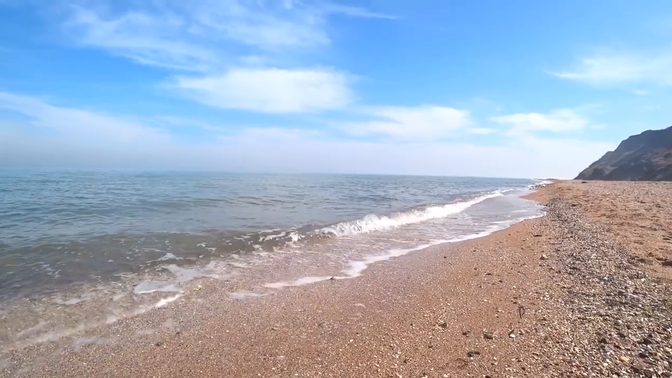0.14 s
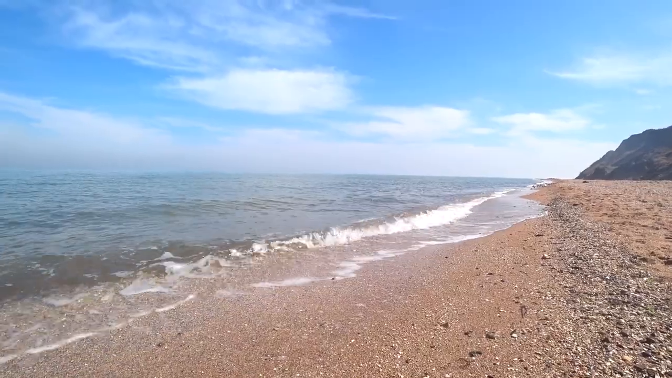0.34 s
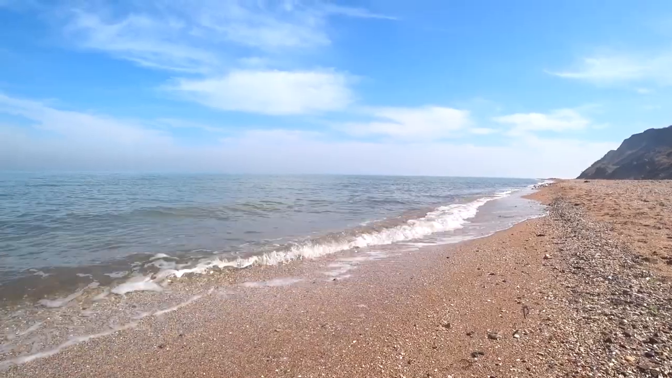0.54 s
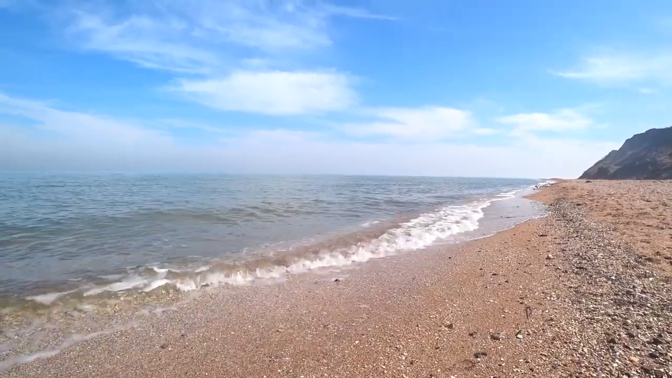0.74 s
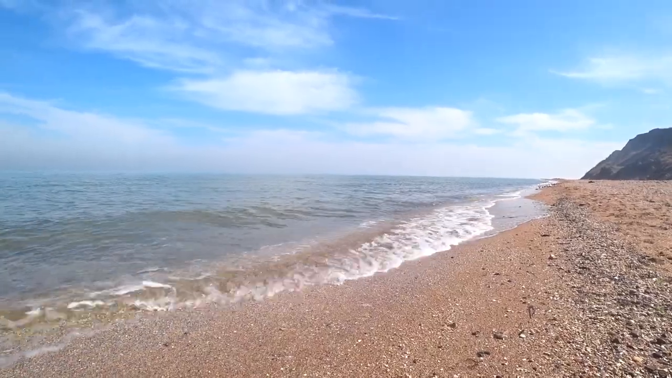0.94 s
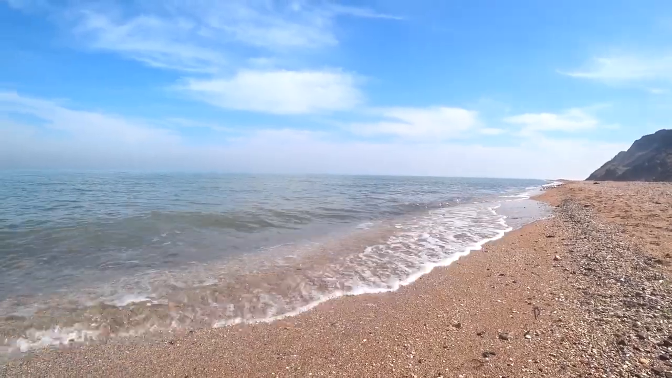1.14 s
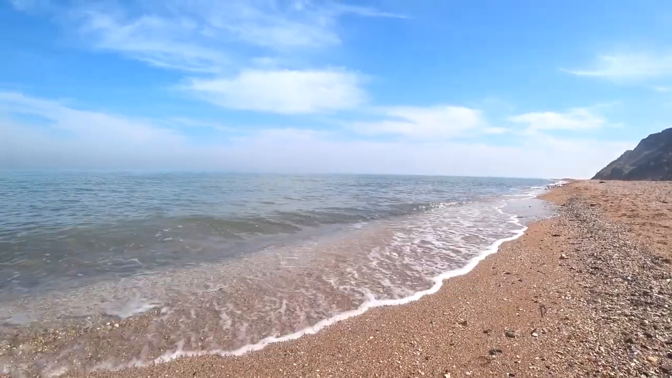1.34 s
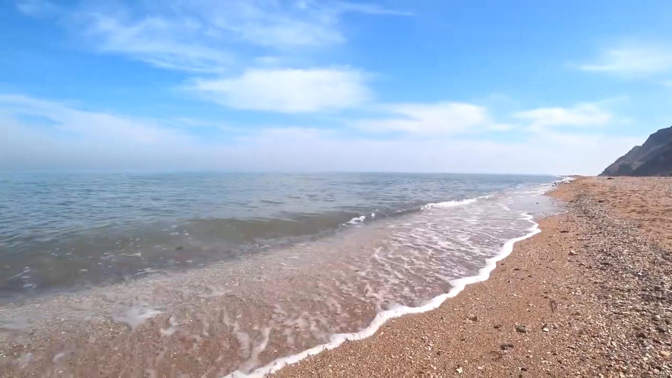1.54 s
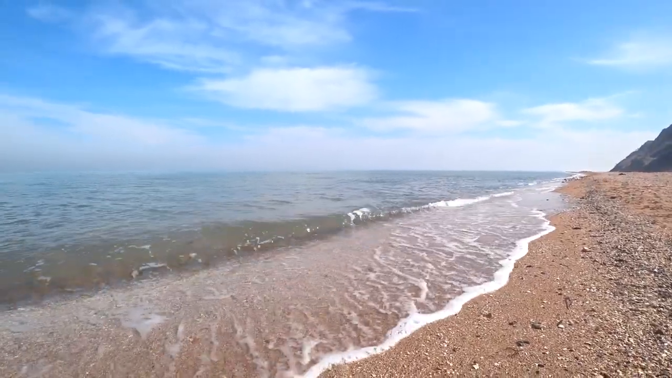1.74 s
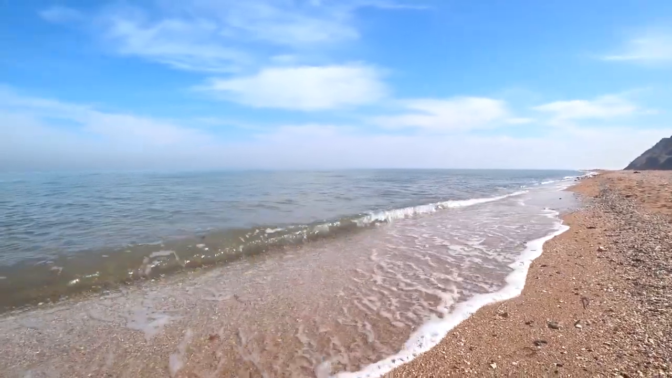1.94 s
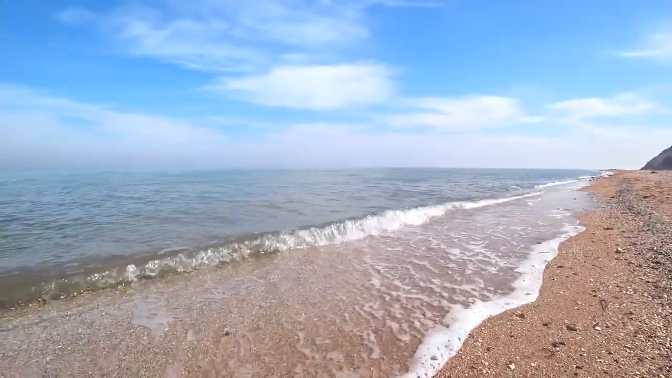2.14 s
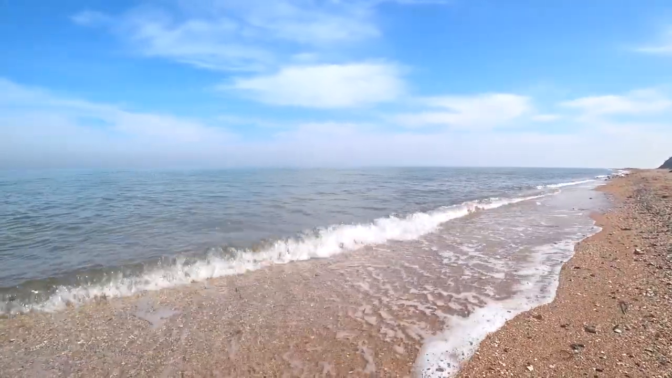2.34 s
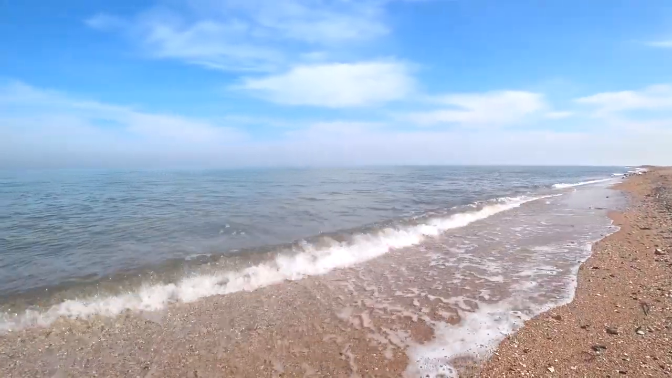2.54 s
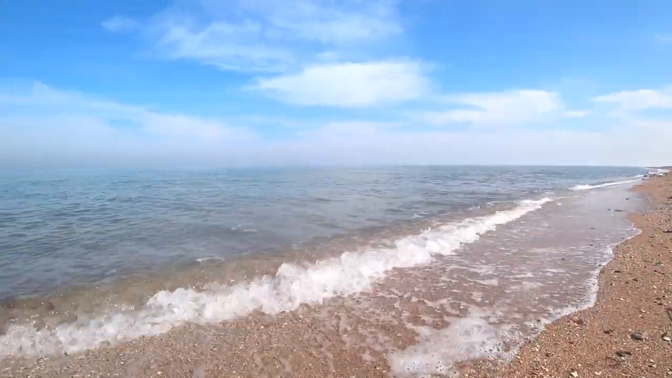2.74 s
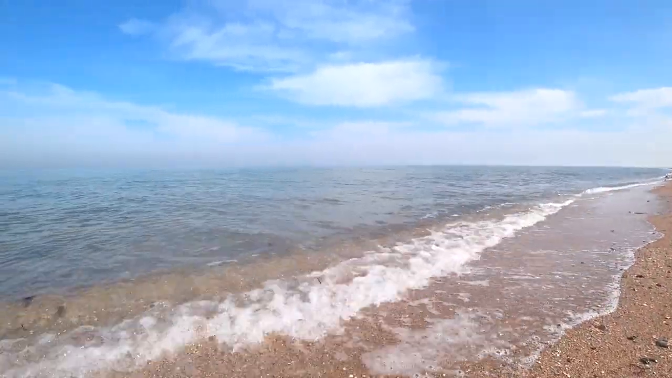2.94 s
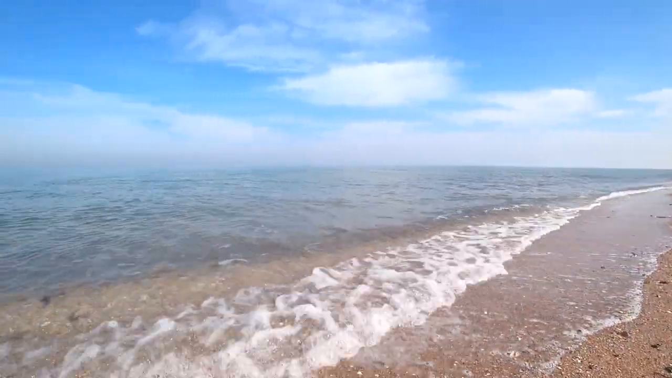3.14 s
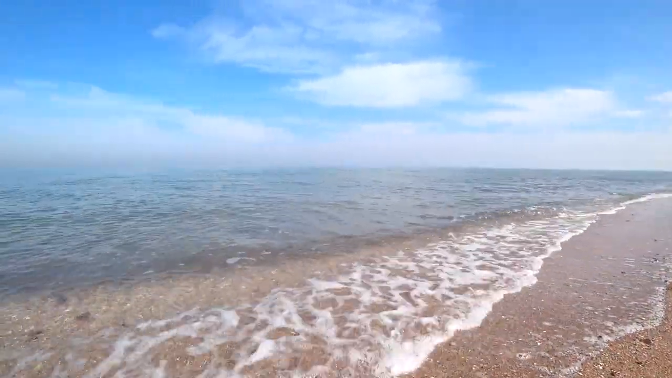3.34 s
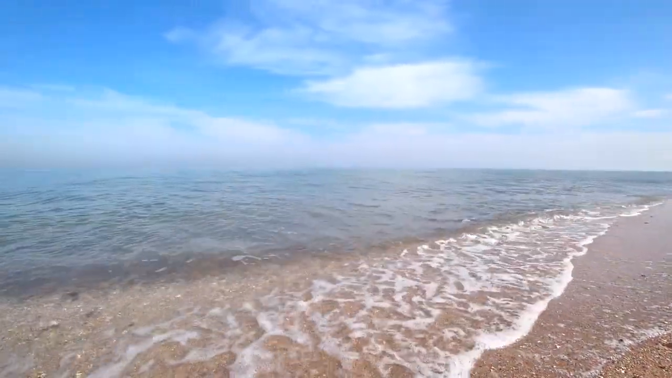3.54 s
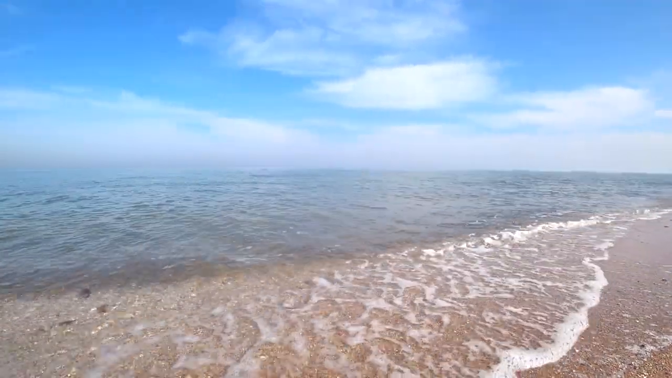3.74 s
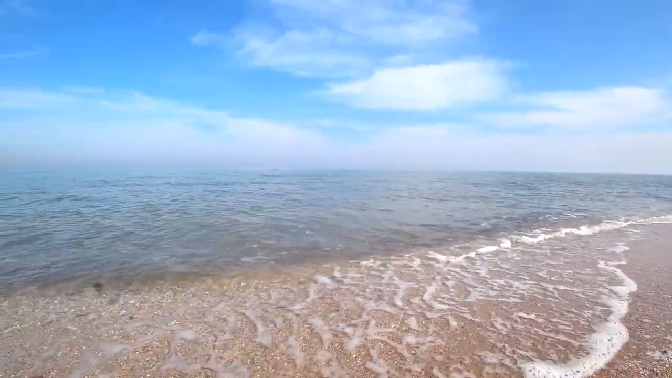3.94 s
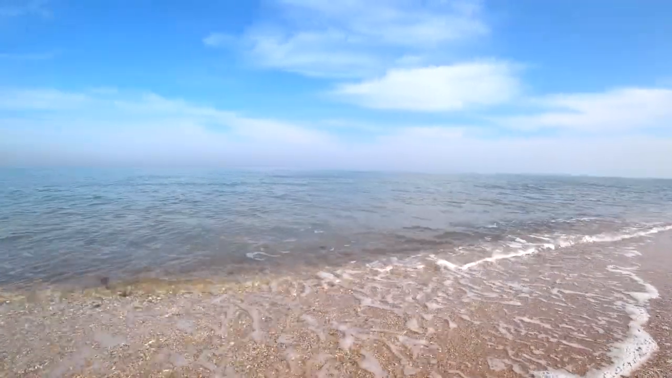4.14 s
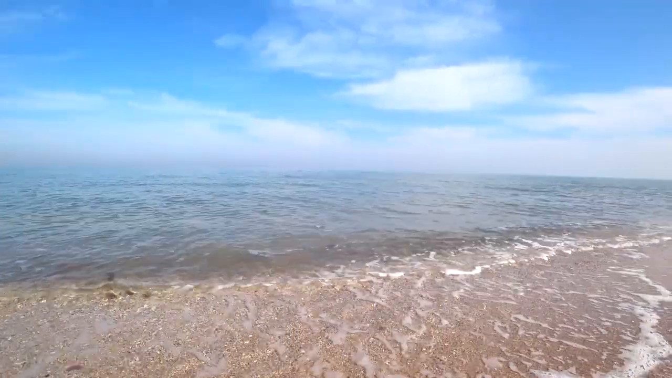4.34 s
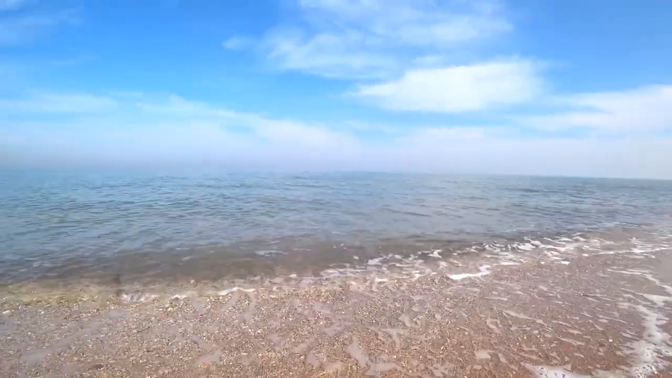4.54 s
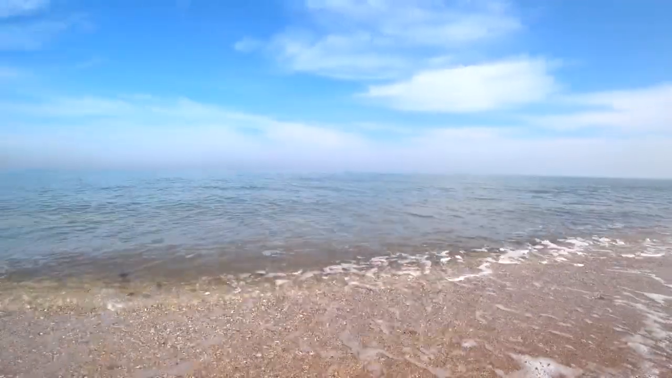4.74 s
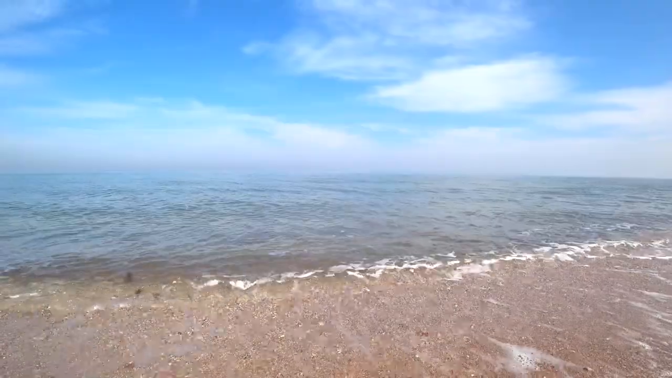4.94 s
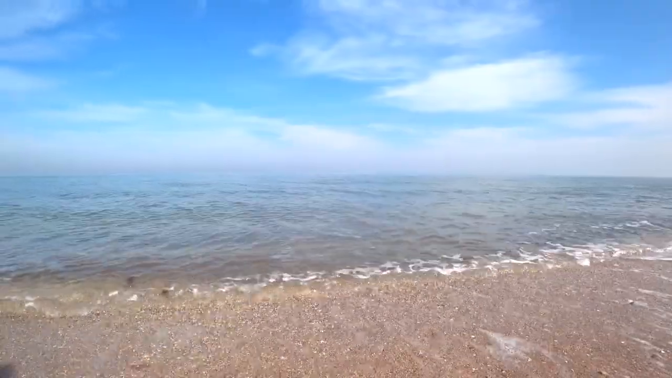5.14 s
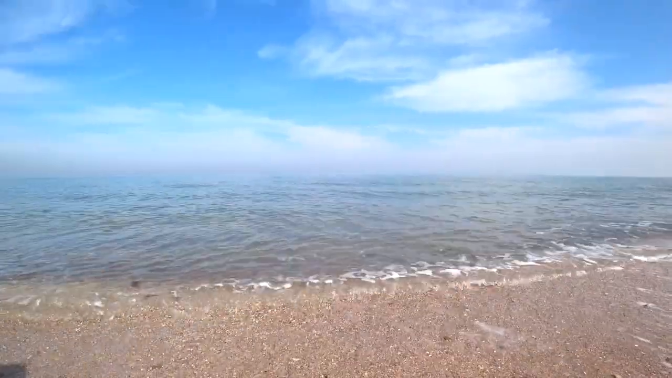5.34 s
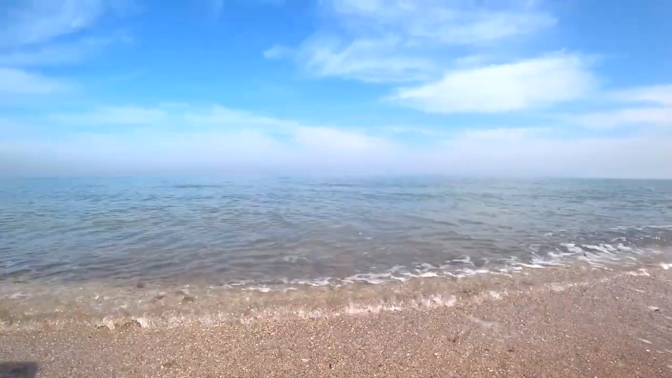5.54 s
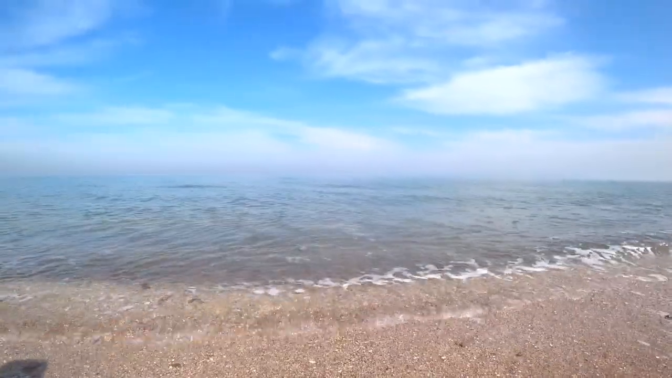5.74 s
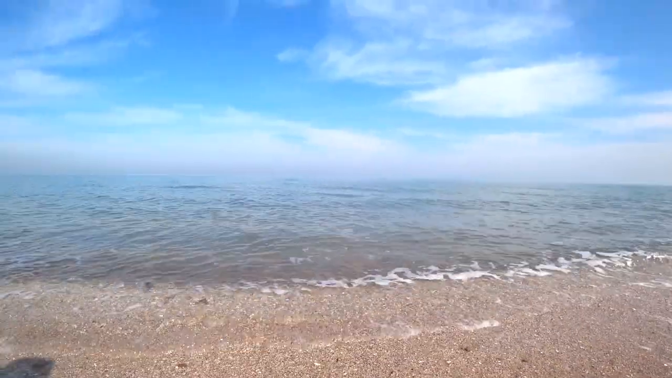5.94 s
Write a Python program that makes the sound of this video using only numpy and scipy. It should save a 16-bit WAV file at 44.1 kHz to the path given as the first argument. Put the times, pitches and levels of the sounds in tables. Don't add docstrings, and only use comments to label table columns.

```python
import sys
import numpy as np
from scipy import signal
from scipy.fft import rfft, irfft
from scipy.io import wavfile
from scipy.ndimage import uniform_filter1d

SR = 44100
rng = np.random.default_rng(int(sys.argv[2]) if len(sys.argv) > 2 else 0)


def master_out(mix):
    frames = np.transpose(np.atleast_2d(mix))
    ceiling = np.clip(frames, -1, 1)
    pcm = np.round(ceiling * 32767).astype(np.int16)
    wavfile.write(sys.argv[1], SR, pcm)


def gain_from_db(level_db):
    decades = np.asarray(level_db, float) / 20
    return 10 ** decades


N = 264159

# centre frequency in Hz, bandwidth in Hz.
BUBBLE_SIZES = [(290, 350), (950, 900), (2350, 2200), (7800, 5500)]
# frequency in Hz, level in dB.
WATER_COLOUR = [(60, -38), (100, -49), (160, -14.5), (290, -2), (500, 1), (950, 0.5), (1600, 0.5),
                (2200, 1.5), (3000, 1.3), (4000, 3), (5500, 1.5), (7800, -0.27), (11000, -8.5)]
# frequency in Hz, change of width in dB.
PORT_WIDTH = [(120, -5), (400, -8), (700, -3), (1200, 1), (2000, 2.5), (3500, -0.5), (6300, 3), (11000, 6)]
# frequency in Hz, share in dB.
GRAIN_SHARE = [(150, -2.5), (500, -6.5), (1500, -5.5), (4000, -4.5), (10000, -3.5)]
# frequency in Hz, density in dB per Hz.
SELF_NOISE_DENSITY = [(25, -114), (60, -107), (150, -110), (6000, -102), (11000, -92)]

# time in seconds, level in dB, coarseness in dB.
BREAKERS = [
    [(0, -33, 0), (0.1, -32.5, -0.5), (0.2, -34, 2.5), (0.45, -34, 2), (0.62, -35.5, 2.5), (0.7, -34.5, 2),
     (0.79, -37, 2.5), (0.85, -40.5, 0), (1.1, -46, 0.5)],
    [(1.86, -54, 3), (1.98, -38.5, 1), (2.12, -29.5, -3), (2.3, -25.5, -4), (2.5, -26, 0), (2.6, -27, 0),
     (2.78, -28.5, 0.5), (3.0, -37, 0), (3.3, -50.5, 2.5)],
    [(5.3, -51.5, -18), (5.45, -44.5, 4.5), (5.56, -43, 7), (5.66, -38.5, 0.5), (5.74, -42, -4),
     (5.77, -53, 3)],
]
# time in seconds, level in dB, coarseness in dB.
FAR_WATER = [(0, -61, -2), (0.9, -48, 1), (1.0, -43.5, 0.5), (1.12, -45, -2), (1.35, -40.5, -0.5),
             (1.6, -42.5, 1), (1.85, -39.5, -1.5), (3.0, -38.5, -0.5), (3.4, -46.5, 1), (3.75, -47, 2),
             (3.93, -41.5, -1), (4.4, -42.5, 0.5), (4.78, -42, -1), (5.08, -41, 1), (5.4, -42, 1),
             (5.79, -37.5, -5.5), (5.88, -39.5, -2.5), (5.99, -39, -3)]
# loudest time in seconds, level in dB, rise and fade in
# seconds for 10 dB.
FOAM = [
    (0.08, -44, .1, 0.7),
    (1.13, -46, 0.1, 0),
    (1.35, -47.5, 0.68, 0.5),
    (1.88, -51, 0.3, 1.9),
    (3.5, -43, 0.4, 0.57),
    (4.2, -56.5, 0.2, 4),
    (5.4, -50, 0.2, 0.4),
    (5.47, -44, 0.025, 0.06),
    (5.56, -42.5, 0.059, 0.1),
    (5.72, -63, 0.054, 0.8),
]
# time in seconds, level in dB, length in seconds.
GULPS = [(0.0, -44.5, 0.053), (0.254, -46, 0.2), (0.703, -49, 0.053), (0.87, -55, 0.11), (1.14, -54, 0.057),
         (1.428, -52, .05), (1.465, -55, .025), (1.7, -59, 0.081), (2.13, -55, .05), (2.372, -38.5, 0.17),
         (2.533, -46, 0.036), (2.68, -47, 0.051), (3.82, -64, 0.055), (4.915, -57, .1), (5.228, -58, 0.15),
         (5.977, -58, 0.045)]
# large, medium, small and foam bubbles in dB, side-to-mid width in dB.
WATER_KINDS = dict(breaker=(-19, -2.5, 0, -6, -14), far=(-17.5, 0, -2.5, -15.5, -4.5),
               foam=(-28, -15, -13.5, 0, -13), gulp=(0.5, -15, -7, -25, -10))
BREAKER_COARSENESS = (0.85, 1.25, 0.19, -0.25)
FAR_COARSENESS = (0.58, 1.27, 0, 0.031)
FROTH_DB = (0.5, 0, -3)
# time in seconds, left-right difference in dB.
BEARING = [(0, -2), (0.55, -1.5), (0.75, .5), (1.1, 1.5), (1.45, 3), (1.7, -1), (2.2, 0), (3.05, 2),
           (3.9, -2), (4.3, 2.5), (4.8, -.5), (5.7, -1), (5.9, -4.5)]
# time in seconds, level in dB.
LEVEL_BUMPS = [(0.17, 1.8), (0.22, -2), (0.85, 1), (0.888, -1.8), (1.59, 1.5), (1.894, -2), (1.92, 0),
               (2.013, -1.3), (2.062, -1), (2.205, 1.5), (2.239, 1.7), (2.36, -1), (2.404, 1.2), (2.448, 2),
               (2.481, 0.9), (2.588, -1), (2.713, -1.5), (2.92, -2), (2.967, -2), (3.121, -1.5), (3.268, -1.1),
               (4.33, 1), (4.779, 1.3), (5.185, 0.5), (5.288, -0.5), (5.368, -1), (5.44, 0), (5.479, -1),
               (5.508, -0.5), (5.543, 0.5), (5.588, -1), (5.622, -0.5), (5.664, -1), (5.731, -1), (5.79, -2)]

# start
# in seconds, peak in dB, frequency in Hz, left-right difference in dB.
PLOPS = [(0.0132, -29.5, 800, -5), (0.1208, -25.5, 1280, -4), (0.1689, -23.5, 1430, -1),
         (0.4163, -26.5, 750, -3), (0.4587, -38, 370, 1), (0.6388, -22, 800, 0), (0.6837, -34, 654, -1),
         (0.7814, -31, 1320, 4), (1.0623, -34, 624, 2), (1.0908, -30, 1450, 10), (1.2956, -35, 880, 2),
         (1.3809, -37, 640, 4), (1.4224, -29, 1360, 15), (1.4379, -30.5, 644, 5), (1.4435, -34.5, 382, 2),
         (1.5805, -31, 910, 4), (1.7571, -31.5, 940, 3), (2.1786, -25.5, 624, 2), (2.2014, -18, 1045, 1),
         (2.2692, -22.5, 827, 0), (2.3073, -19, 1260, 0), (2.3532, -24, 513, -2), (2.4055, -32, 890, -2),
         (3.0228, -30, 1030, 9), (4.1486, -37, 716, 4), (4.6597, -28.5, 1430, 9), (4.8528, -42, 483, -3),
         (5.6423, -30.5, 930, 6), (5.7009, -31, 1550, 3.5), (5.8798, -38, 980, -10)]
PINGS = [(0.3881, -22.5, 1780, -1), (0.5682, -19, 3360, 0), (0.6677, -20, 2180, 0),
         (0.7109, -21.5, 4000, 0), (0.7293, -23, 1780, 4), (0.7429, -18.5, 3880, 0), (0.7752, -26, 1890, 2),
         (1.2787, -29, 2030, 3), (1.3094, -30, 3040, 7), (1.3325, -30, 3540, 10), (1.3669, -29, 1810, 10),
         (1.4265, -30.5, 2500, 6), (1.5958, -30, 3250, 6), (2.0039, -20.5, 3240, -3),
         (2.24, -15.5, 1890, 0), (2.4414, -13, 3700, 4), (2.5138, -15, 3580, -1), (2.5183, -13.5, 1920, 5),
         (3.0772, -23.5, 2200, 1), (4.6215, -33, 3500, 5), (4.6764, -33, 3740, 7),
         (5.3466, -28.5, 2330, -8), (5.4286, -28, 3450, -6), (5.4568, -25, 6870, -3),
         (5.5461, -25, 5400, -2), (5.5734, -24, 3740, -1), (5.6021, -27, 2720, 0), (5.6424, -27, 5540, -1),
         (5.7462, -23, 2200, 2), (5.8014, -31, 1930, -1)]
BLOOPS = [(0.13, -51, 137, 3), (0.4075, -39, 346, -1), (0.6631, -37, 456, 2), (0.8636, -44, 313, 3),
          (1.117, -42, 390, 2), (1.2101, -52, 254, 0), (1.3295, -34, 930, 6), (1.4636, -51, 352, 2),
          (1.6474, -46, 450, -2), (1.7058, -47, 310, 1), (1.7404, -48, 427, 1), (2.1018, -39, 313, -2),
          (2.2762, -39, 420, 3), (2.3297, -34, 394, -4), (2.535, -51.5, 133, 1), (2.685, -30, 575, 2),
          (3.8549, -52, 300, -3), (4.2367, -43, 420, 2), (4.8199, -38, 694, 1), (5.1427, -43, 494, -2),
          (5.644, -51, 378, 5), (5.76, -42, 530, -1), (5.8902, -44, 533, -6), (5.9304, -43, 690, -6)]
POPS = [(0.4567, -28, 8410, 0), (1.1534, -33, 1160, 7), (1.4368, -30, 4000, 7), (1.4539, -34, 1320, 14),
        (2.3454, -16, 6870, -2), (2.367, -22, 1090, 0), (4.0776, -35, 3060, 9), (5.4748, -30, 6000, -1),
        (5.55, -32, 940, -4), (5.5611, -29, 7350, 4), (5.571, -30, 1350, -5), (5.5935, -28, 6000, -1),
        (5.5968, -28, 3470, 2.5), (5.6126, -34, 1540, -1), (5.6749, -28, 7350, -1), (5.7115, -27, 3760, -2),
        (5.7382, -26, 6400, 2), (5.7384, -27, 3060, -4)]
# start in seconds, peak in dB, frequency in Hz, left-right difference in dB.
FURTHER_BUBBLES = [(0.0454, -32, 8990, -2), (0.0889, -24, 6810, -3), (0.1593, -23, 6100, -5),
                   (0.1738, -30, 8990, -1), (0.1825, -29, 1090, -3), (0.4546, -28, 2960, -1),
                   (0.4974, -31, 1090, -3), (0.5366, -26, 1520, 1), (0.5478, -29, 1230, -2),
                   (0.587, -28, 820, 1), (0.6904, -30, 1800, 0), (0.7064, -22, 1590, 2), (0.7216, -29, 760, 0),
                   (0.722, -30, 1440, 1), (0.7561, -27, 2510, -1), (0.7505, -24, 3600, 0),
                   (0.7677, -29, 2160, -1), (0.7811, -30, 1290, 3), (0.7964, -28, 2250, 0),
                   (0.8624, -27, 5460, -1), (0.8726, -27, 5500, 1), (0.8726, -24.5, 3900, 2),
                   (0.8998, -28, 3130, 5), (1.1378, -35, 1800, 10), (1.1537, -29, 5770, 5),
                   (1.1661, -29, 4140, 0), (1.2082, -38, 1090, 10), (1.2085, -34, 1910, 11),
                   (1.2466, -36, 754, 4), (1.2912, -36, 855, 6), (1.2916, -33, 1610, 5), (1.309, -31, 4880, 6),
                   (1.3605, -31, 1920, 3), (1.3794, -31, 2800, 4), (1.383, -36, 466, 1), (1.4335, -33, 626, 4),
                   (1.395, -31, 2800, 6), (1.411, -31, 2130, 5), (1.4255, -33, 4620, 4), (1.4349, -34, 960, 7),
                   (1.473, -34, 1800, 9), (1.4759, -32, 2800, 7), (1.5771, -39, 2130, 7),
                   (1.7469, -31, 1440, 4), (1.7484, -30, 4370, 6),
                   (1.9269, -35.5, 646, 5), (1.9628, -34, 1010, 7), (1.986, -20, 4900, -6),
                         (1.9871, -26, 3150, 0), (1.9966, -30, 1100, -1), (2.0249, -36, 1160, 4),
                         (2.1025, -22, 4620, -1), (2.1246, -26, 2130, -1), (2.1319, -18, 5160, -3),
                         (2.182, -25, 1220, 2), (2.2124, -27, 1620, 12), (2.224, -23, 1800, 1),
                         (2.2603, -27, 1610, 2), (2.261, -19, 3130, 1), (2.2643, -19, 5160, -3),
                         (2.2781, -22, 5460, -2), (2.2962, -18, 2130, 1), (2.33, -23, 4880, 1),
                         (2.3822, -24, 686, 0), (2.3844, -20, 1710, -1), (2.4058, -22, 780, -1),
                         (2.407, -16, 3860, 0), (2.451, -18, 2050, 0), (2.524, -17, 1900, 2),
                         (2.4776, -28, 1020, -1), (2.5016, -28, 1100, 0), (2.507, -18, 2130, -1),
                         (2.5596, -23, 1220, 5), (2.6191, -21, 8040, 1), (2.6358, -18, 2510, 1),
                         (2.6514, -22, 4140, 1), (2.6794, -26, 766, 3), (2.6881, -29, 593, 0), (2.786, -25, 3910, 3),
                         (2.8408, -28, 1100, 3), (2.8731, -27, 9500, 0), (2.8775, -26, 1550, 1),
                         (2.9761, -30, 990, 4), (2.9917, -30, 6440, 2), (2.9943, -32, 9500, 5),
                         (3.0117, -24, 1700, 2), (3.0121, -26, 2250, 0), (3.0331, -28, 4880, 1),
                         (3.0563, -26, 2380, -1), (3.0737, -31, 1520, 7), (3.1318, -41, 790, 2),
                         (3.1536, -29, 3150, 3), (3.2279, -35, 1800, 3),
                   (3.6539, -39, 1050, 0), (3.8175, -38, 4880, 1), (3.9024, -33, 2510, -2),
                        (3.984, -35, 1810, -7), (4.0428, -34, 1370, -10), (4.4345, -45, 545, 4),
                        (4.6586, -33, 1900, 10), (4.5319, -40, 750, 3), (4.5468, -33, 1520, 0),
                        (4.7536, -37, 2530, -10), (4.7779, -39, 1530, 3), (4.881, -39, 1450, -7.5),
                        (4.887, -38, 930, -7), (4.9128, -34, 1800, 2), (4.9538, -34, 9500, 5),
                        (4.9629, -38, 1090, -8), (5.0191, -39, 880, -3), (5.0612, -36.5, 1900, 16),
                        (5.0654, -36, 895, 1), (5.2085, -37, 2800, 1), (5.2089, -38, 775, 5), (5.308, -31, 2670, 0),
                        (5.388, -30, 2250, 5), (5.4676, -32, 1440, -2), (5.4967, -26, 2650, 2),
                        (5.51, -35, 616, -2.5), (5.536, -32, 1700, -3), (5.5427, -27, 5460, 0),
                        (5.5521, -31, 3910, -3), (5.5637, -27, 3500, 3), (5.572, -24, 5200, 2),
                        (5.598, -29, 2650, 1), (5.749, -25, 2280, 2), (5.711, -34, 7200, 1), (5.7157, -30, 1600, -2),
                        (5.7988, -30, 2020, -1), (5.867, -39, 835, -8), (5.9, -37.5, 1700, -12),
                        (5.924, -31, 3530, -11), (5.9646, -42, 1700, -10)]
# start in seconds, peak in dB.
SPLATS = [(0.2728, -21), (0.4556, -14.5), (0.6383, -26), (0.7417, -35), (0.8614, -31), (1.0635, -31),
          (1.0994, -27), (1.1528, -22), (1.9849, -33), (2.0981, -20.5), (2.1306, -31), (2.7334, -22),
          (2.8394, -23), (2.9352, -35), (2.9911, -20), (3.0154, -27), (3.051, -21), (5.3448, -26),
          (5.3797, -32), (5.3961, -30), (5.4504, -28), (5.4644, -24), (5.485, -19), (5.5418, -28),
          (5.5684, -22), (5.5804, -25), (5.596, -22), (5.6411, -25), (5.6735, -29), (5.7099, -38),
          (5.7369, -25)]

PLOP_CYCLES, PING_CYCLES, BLOOP_CYCLES, POP_CYCLES, FURTHER_CYCLES = 6.8, 7.8, 5.5, 11, 7.2
DRAIN_DB_PER_S = 39
JUMP_S, SAG_S = 0.0054, 0.014
BASS_CUT_HZ = 178


def evened(x):
    return x / np.sqrt(np.mean(x ** 2) + 1e-20)


def read(points, hz):
    f, value = np.transpose(points)
    return np.interp(np.log(hz + 1), np.log(f + 1), value)


def ports(mid, side, pan_db):
    left = (mid + side) * gain_from_db(pan_db / 2)
    right = (mid - side) * gain_from_db(-pan_db / 2)
    return np.array([left, right])


def sloshing(count, per_s, top_hz):
    f = np.fft.rfftfreq(count, 1 / per_s)
    band = (f > 12) * (f < top_hz) / np.sqrt(f + 4)
    kicks = evened(irfft(rfft(rng.standard_normal(count)) * band, count))
    decay = np.exp(-0.6 * top_hz / per_s)
    surge = np.log(signal.lfilter([1], [1, -decay], gain_from_db(12 * kicks)) + 1e-3)
    return evened(surge - uniform_filter1d(surge, size=int(per_s / 15)))


def ring(hz, cycles, rise, soft):
    u = np.arange(int(2.5 * cycles * SR / hz) + 8) * hz / SR
    shape = (1 - np.exp(-u / soft)) * np.exp(-2.3 * u / cycles)
    phase = u + rise * u ** 2 / (2 * cycles)
    return shape / shape.max() * np.sin(2 * np.pi * phase)


def bearing(t):
    return np.interp(t, *np.transpose(BEARING))


def water(t):
    s, db, coarse_db = np.transpose(FAR_WATER)
    far_db = np.interp(t, s, db) + np.outer(FAR_COARSENESS, np.interp(t, s, coarse_db))
    parts = [("far", far_db)]
    for breaker, froth_db in zip(BREAKERS, FROTH_DB):
        s, db, coarse_db = np.transpose(breaker)
        outside_s = abs(t - np.clip(t, s[0], s[-1]))
        level_db = np.interp(t, s, db) - DRAIN_DB_PER_S * outside_s + np.c_[[0, 0, 0, froth_db]]
        coarse = np.outer(BREAKER_COARSENESS, np.interp(t, s, coarse_db))
        parts.append(("breaker", level_db + coarse))
    for s, db, rise, fade in FOAM:
        parts.append(("foam", db - 10 * ((t - s) / np.where(t < s, rise, fade)) ** 2))
    for s, db, length in GULPS:
        parts.append(("gulp", db - 10 * ((t - s) / length) ** 2))

    mid_power, side_power = 0, 0
    for kind, db in parts:
        *size_db, width_db = WATER_KINDS[kind]
        power = gain_from_db(db + np.array(size_db)[:, None]) ** 2
        mid_power = mid_power + power
        side_power = side_power + power * gain_from_db(width_db) ** 2

    surge_db = 0
    for s, db in LEVEL_BUMPS:
        rising = (t - s) * db < 0
        surge_db = surge_db + db * np.exp(-((t - s) / np.where(rising, JUMP_S, SAG_S)) ** 2)
    return 10 * np.log10(mid_power) + surge_db, 10 * np.log10(side_power / mid_power)


def surf_db(hz, t):
    size_db, side_db = water(t)
    centres = [f for f, _ in BUBBLE_SIZES]
    share = np.array([read(np.c_[centres, one_size], hz) for one_size in np.eye(len(centres))])
    per_hz = size_db - 10 * np.log10([[width] for _, width in BUBBLE_SIZES])
    level_db = share.T @ per_hz + read(WATER_COLOUR, hz)[:, None]
    return level_db, bearing(t), share.T @ side_db + read(PORT_WIDTH, hz)[:, None]


def grainy(hz, side_db):
    return np.clip(gain_from_db(read(GRAIN_SHARE, hz) - 0.23 * (side_db + 9.0)), 0, .95)


def hiss():
    frames, hz = N // 128 + 5, np.fft.rfftfreq(512, 1 / SR)
    a, b, c, d, patches = rng.standard_normal((frames, 257, 5)).T
    patches = uniform_filter1d(patches, size=6, axis=0)
    patches = evened(uniform_filter1d(patches, size=20, axis=1))
    level_db, pan_db, side_db = surf_db(hz, np.arange(frames) * 128 / SR)
    blur = np.sqrt(1 - grainy(hz[:, None], side_db) ** 2)
    flutter_db = 0.75 * patches + 0.35 * sloshing(frames, SR / 128, 76)
    mid = blur * gain_from_db(level_db + flutter_db)
    z = ports(mid * (a + 1j * b), mid * gain_from_db(side_db) * (c + 1j * d), pan_db)
    return gain_from_db(21.0) * signal.istft(z, nperseg=512, noverlap=384)[1][:, :N]


def cloud(count=46):
    t, pitches = np.arange(N) / SR, np.geomspace(140, 10800, count)
    slow_t = t[::64]
    level_db, pan_db, side_db = surf_db(pitches, slow_t)
    clumps = gain_from_db(3.0 * sloshing(N, SR, 150))
    mid, side = np.zeros((2, N))
    for hz, db, wide_db in zip(pitches, level_db, side_db):
        born, size, way = rng.random((3, N), dtype=np.float32)
        per_s = 60 * (hz / 1000) ** .9 * clumps
        train = evened((born < per_s / SR) * gain_from_db(-3.5 * np.log(size + 0.072)))
        band = hz * np.log(pitches[1] / pitches[0])
        train *= np.interp(t, slow_t, gain_from_db(db) * grainy(hz, wide_db)) * np.sqrt(band)
        bubble = ring(hz, cycles=4.0 + 2.8 * born[0], rise=0.058, soft=0.35 + 400 / hz)
        bubble /= np.linalg.norm(bubble)
        aside = np.sqrt(12) * (way - .5) * gain_from_db(np.interp(t, slow_t, wide_db))
        mid += signal.oaconvolve(train, bubble)[:N]
        side += signal.oaconvolve(train * aside, bubble)[:N]
    return ports(mid, side, np.interp(t, slow_t, pan_db))


def patter():
    s, t = np.arange(0, N, 256) / SR, np.arange(N) / SR
    size_db, width_db = water(s)
    foam_db, side_db = size_db[-1], width_db[-1]
    born, size = rng.random((2, N))
    a, b = rng.standard_normal((2, N))
    drops = (born < 70 / SR) * gain_from_db(-3.0 * np.log(size + 0.027))
    flutter = evened(signal.lfilter([1], [1, -np.exp(-1 / (0.001 * SR))], drops))
    near = gain_from_db(np.interp(t, s, foam_db - 14.0 - 0.37 * side_db)) * flutter
    tone = [1.1, 1.95, 0.083, -1.8, -0.44]
    mid, side = signal.lfilter(tone, 3.5, [a * near, 0.41 * b * near])
    return ports(mid, side, np.interp(t, s, bearing(s)))


def near_bubbles():
    out = np.zeros((2, N + SR))
    further = FURTHER_BUBBLES
    kinds = ((PLOPS, PLOP_CYCLES), (PINGS, PING_CYCLES), (BLOOPS, BLOOP_CYCLES),
             (POPS, POP_CYCLES), (further, FURTHER_CYCLES))
    for rows, cycles in kinds:
        for (s, db, hz, pan_db), (long, climb) in zip(rows, rng.random((len(rows), 2))):
            bubble = ring(hz * 0.972, cycles * (0.86 + 0.35 * long),
                          rise=0.018 + 0.12 * climb, soft=0.46 + 250 / hz)
            plop = gain_from_db(db + 1.5 - 0.31 * np.log2(1 + hz / 1000)) * bubble
            at = round(max(s, 0) * SR)
            out[:, at:at + len(plop)] += gain_from_db([[pan_db / 2], [-pan_db / 2]]) * plop
    return out[:, :N]


def spray():
    out, t = np.zeros((2, N + SR)), np.arange(400) / SR
    for (s, db), noise in zip(SPLATS, rng.standard_normal((len(SPLATS), 400))):
        pan_db = bearing(s)
        crackle = signal.lfilter([1, 0, -1], 1, noise * np.exp(-t / 0.0013))
        crackle /= abs(crackle).max()
        at = round((s + 0.00058) * SR)
        out[:, at:at + 400] += gain_from_db([[db - 2.5 + pan_db / 2], [db - 3.0 - pan_db / 2]]) * crackle
    return out[:, :N]


def self_noise():
    a, b = rng.standard_normal((2, N))
    shape = gain_from_db(read(SELF_NOISE_DENSITY, np.fft.rfftfreq(N, 1 / SR))) * np.sqrt(SR / 2)
    puffs = gain_from_db(1.4 * sloshing(N, SR, 20))
    return irfft(rfft(ports(a, 0.56 * b, 0) * puffs) * shape, N)


def scene():
    return hiss() + cloud() + near_bubbles() + spray() + patter()


def band_limit(x):
    return signal.sosfilt(signal.butter(12, 11030, fs=SR, output="sos"), x)


def record(dry):
    running = np.c_[dry[:, ::-1], dry]
    bass_cut = signal.butter(2, BASS_CUT_HZ, "high", fs=SR, output="sos")
    mix = signal.sosfilt(bass_cut, running)[:, N:] + self_noise()
    return band_limit(mix)


dry = scene()
out = record(dry)
master_out(out)
```